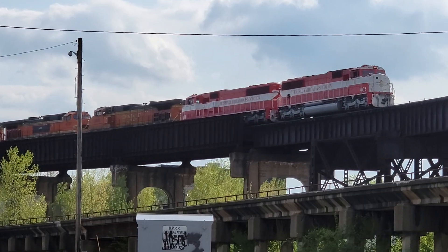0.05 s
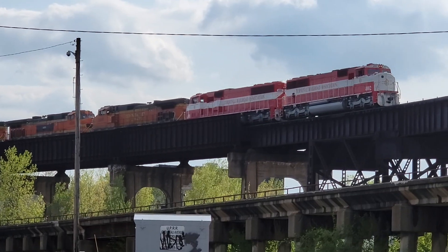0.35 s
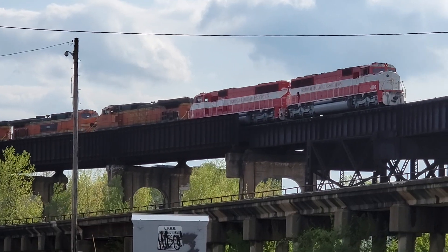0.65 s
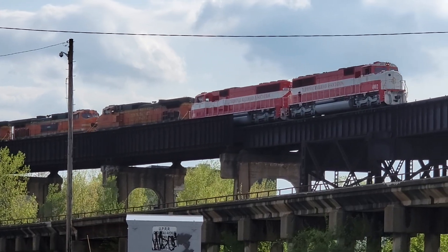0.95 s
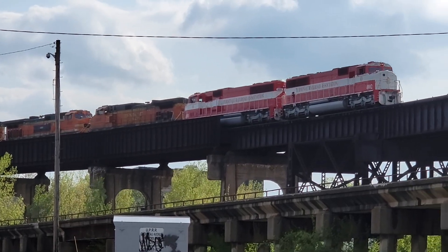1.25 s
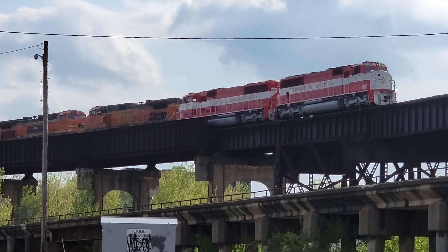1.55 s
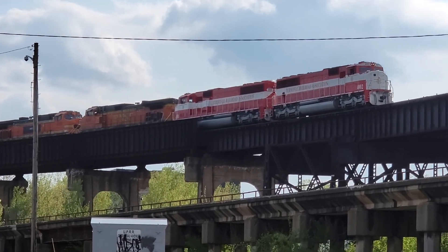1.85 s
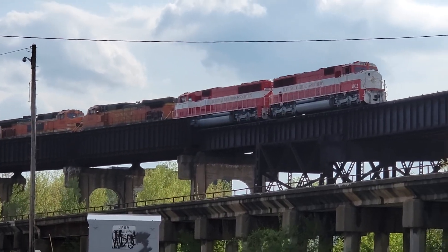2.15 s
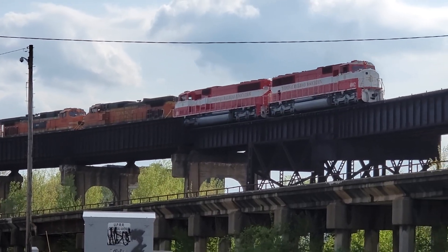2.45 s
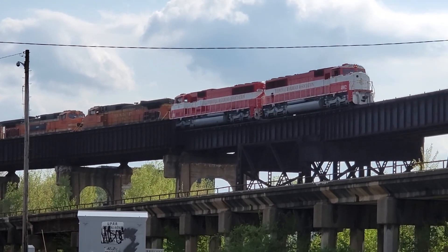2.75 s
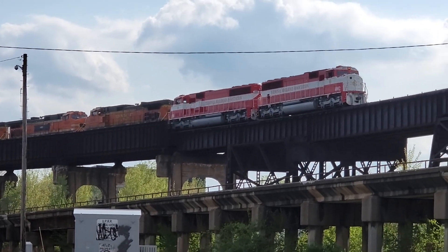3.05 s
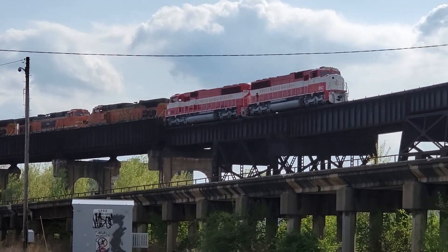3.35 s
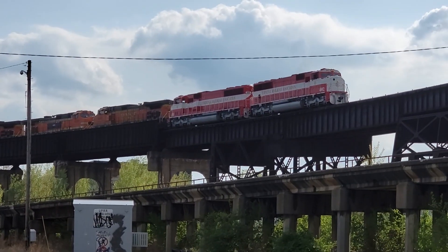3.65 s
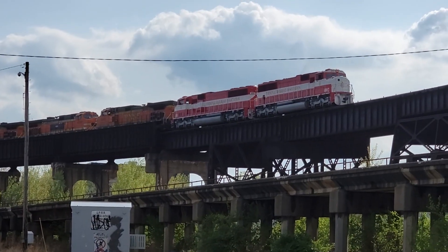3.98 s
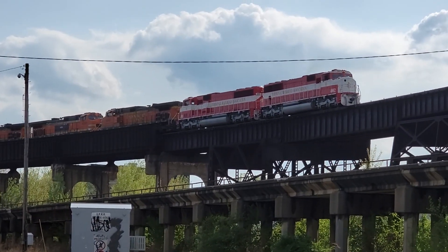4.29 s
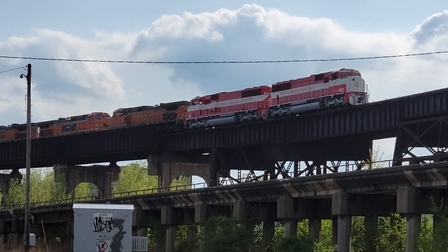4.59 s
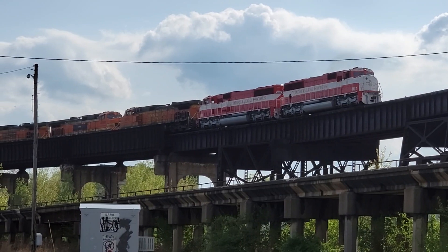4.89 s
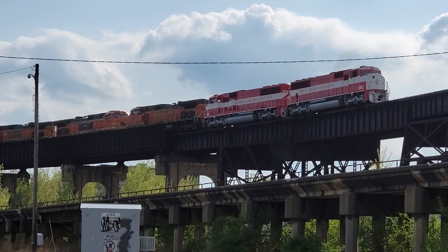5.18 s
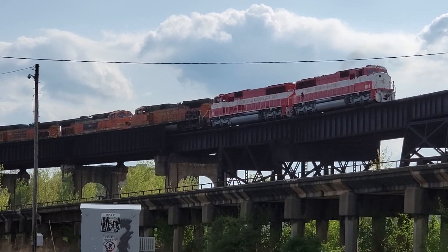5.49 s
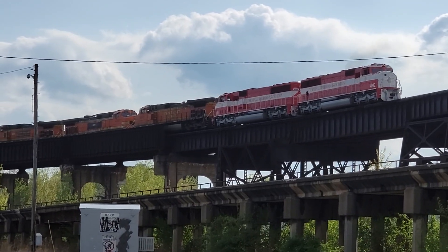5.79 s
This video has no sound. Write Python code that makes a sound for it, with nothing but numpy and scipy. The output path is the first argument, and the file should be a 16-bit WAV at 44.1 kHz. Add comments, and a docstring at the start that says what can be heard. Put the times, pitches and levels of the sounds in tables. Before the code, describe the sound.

A deep, continuous diesel drone swells and dips as locomotives climb an elevated railway, heard outdoors from ground level at some distance. A brief metallic wheel scrape opens the sound, and quieter rubbing and thin ringing return in spells. Soft, low booms punctuate the engine throb at uneven intervals. A wavering turbocharger and fan whine sits over rushing air throughout, and the drone grows strongest near the end.

```python
"""On the ground some way from a steel viaduct, as heavy diesel locomotives haul a train slowly up it.
Periodic cylinder firings make the exhausts drone and rumble; turbochargers and fans whine at their
blade-passing frequencies over a rush of cooling air. Friction makes the wheels rub and ring in spells.
There are a few faint ticks, and now and then the deep throb gives way to a soft boom."""
import sys
import numpy as np
from scipy import signal
from scipy.fft import rfft, irfft
from scipy.io import wavfile
from scipy.ndimage import uniform_filter1d, minimum_filter1d

SR = 44100
rng = np.random.default_rng(int(sys.argv[2]) if len(sys.argv) > 2 else 0)


def dump(signal):
    """Clip the signal to [-1, 1] and save it as 16-bit WAV at the path in sys.argv[1]."""
    limited = np.clip(np.atleast_2d(signal).T, -1, 1)
    pcm = np.round(limited * 32767).astype(np.int16)
    wavfile.write(sys.argv[1], SR, pcm)


N = 265830
TIME = np.arange(N) / SR
FREQS = np.maximum(np.arange(N // 2 + 1) * SR / N, 1)

# spectrum of steel rubbing on steel: f/Hz, relative level/dB
FRICTION_SPECTRUM = [(500, -24), (1500, 2.5), (2100, 3.5), (2750, -2), (3300, 0.5), (4400, -1.5),
                     (5050, -5), (5400, -10), (6500, -14.5), (7200, -23), (7800, -20.5), (8300, -17.5),
                     (9000, -29), (10300, -34), (11000, -46)]
# low booms in the rumble: t/s, peak level/dB
BOOM_EVENTS = [(.62, -7.5), (1.51, -9), (2.47, -18), (2.92, -11.5), (3.61, -17), (4.31, -14.5), (5.24, -12),
               (5.93, -10.5)]


def undb(db):
    """Amplitude ratio of a level in decibels."""
    return 10 ** (np.asarray(db) / 20)


def unit(x):
    """Normalisation to rms 1."""
    return x / np.sqrt(np.mean(x ** 2))


def contour(points):
    """Linear interpolation of (t/s, level/dB) points to a level at every sample."""
    return np.interp(TIME, *np.transpose(points))


def response(points):
    """Amplitude response through (f/Hz, level/dB) points on a logarithmic frequency axis."""
    hz, db = np.transpose(points)
    return undb(np.interp(np.log(FREQS), np.log(hz), db))


def wander(rate_hz):
    """Low-pass random fluctuation of rms 1, changing about rate_hz times a second."""
    knots = rng.standard_normal(2048)
    slow = np.interp(2 * rate_hz * TIME, np.arange(len(knots)), knots, period=len(knots))
    return unit(uniform_filter1d(slow, max(int(SR / rate_hz / 2), 1)))


def noise(spectrum, width):
    """Shaped stereo noise whose interaural coherence falls towards the treble."""
    mid, side = rfft(rng.standard_normal((2, N))) * response(spectrum)
    side *= np.minimum(width * (FREQS / 2000) ** 0.46, 1)
    return unit(irfft(np.array([mid + side, mid - side]), N))


def tone(hz, scatter, scatter_hz, width):
    """Multipath scattering by air and steelwork broadens a tone and spreads it sideways."""
    phase = 2 * np.pi * np.cumsum(hz * np.ones(N)) / SR
    cos, sin = np.cos(phase), np.sin(phase)
    mid = cos + scatter * (wander(scatter_hz) * cos + wander(scatter_hz) * sin)
    side = width * (wander(2.7) * cos + wander(3.5) * sin)
    return unit(np.array([mid + side, mid - side]))


def exhaust(cycle_hz=9.45, cylinders=16, drone_hz=74.9):
    """Impulse excitation: unequal firings ring the stack and sound harmonics of the engine cycle."""
    # exhaust spectrum: f/Hz, relative level/dB
    stack_spectrum = [(20, -25.5), (30, -14), (38, -4.5), (50, 5.5), (65, 3.5), (85, 2), (110, -7.5),
                      (150, -3), (200, -7), (230, -14.5), (310, -17.5), (460, -33.5), (900, -34),
                      (2500, -80.5)]
    # lines from unequal cylinders: multiple of the engine cycle, level/dB
    engine_orders = [(7, -35.5), (9, -32), (11, -35), (13, -44), (14, -37.5), (15, -45), (16, -34.5),
                     (20, -42.5), (22, -42)]
    # drone, swelling as the locomotives drift in and out of step: t/s, level/dB
    drone_levels = [(0.0, -17.5), (0.18, -12), (1.64, -18), (1.78, -36), (1.85, -14.5), (2.84, -14.5),
                    (3.0, -29.5), (3.74, -10.5), (4.03, -27), (4.3, -9), (4.85, -16.5), (5.1, -4),
                    (5.42, -13.5), (5.59, -26.5), (5.69, -18), (5.84, -34), (5.98, -12), (6.03, -24)]
    firing_count = cylinders * cycle_hz * TIME
    firings = np.flatnonzero(np.diff(np.floor(firing_count)))
    pulses = np.zeros(N)
    pulses[firings] = 0.013 + 0.56 * rng.standard_normal(len(firings))
    beats = unit(irfft(rfft(pulses) * response(stack_spectrum), N))
    # gas leaves in puffs, and the viaduct smears them into a rumble
    rumble = noise(stack_spectrum, 0.49) * (1 + 0.43 * np.cos(np.pi * firing_count))
    orders = sum(tone(k * cycle_hz, 0.48, 1.524, .08) * undb(db) for k, db in engine_orders)
    lope = 1 + 0.097 * np.cos(2 * np.pi * cycle_hz * TIME)
    drone = tone(drone_hz, .03, 10, .06) * lope * undb(contour(drone_levels))
    return undb(-26.5) * beats + undb(-23) * rumble + orders + drone


def throb(hz=41.9, level_db=-21, dip_db=11.5, dip_s=.11):
    """Amplitude modulation: the deep tone of the trailing locomotives sinks under each boom."""
    dips = sum(np.exp(-((TIME - s) / dip_s) ** 2) for s, _ in BOOM_EVENTS)
    return tone(hz, 0.11, 2.8, .08) * undb(level_db - dip_db * dips)


def turbocharger(start_hz=743.5, end_hz=733.5, settle_s=3.5):
    """Blade-passing tone and its octave; the pitch sinks and settles as the train draws level."""
    # blade tone heard through moving air: t/s, relative level/dB
    blade_levels = [(0.0, -39), (0.13, -37.5), (0.82, -30), (1.8, -28), (2.43, -40), (2.62, -32.5),
                    (3.41, -30), (3.56, -32.5), (3.88, -28.5), (4.67, -35), (5.64, -26), (6.01, -25),
                    (6.03, -31)]
    # its octave, swelling and fading independently: t/s, relative level/dB
    octave_levels = [(0.0, -36.5), (0.62, -48), (0.64, -60), (1.04, -39.5), (1.26, -59), (2.08, -34),
                     (2.38, -45.5), (2.9, -31), (3.11, -38.5), (3.41, -29.5), (4.16, -43.5), (5.12, -49),
                     (5.69, -35.5), (6.03, -39)]
    hz = end_hz + (start_hz - end_hz) * np.exp(-TIME / settle_s)
    blade = tone(hz, 0.21, 23, 0.094) * undb(contour(blade_levels) + 2.48)
    octave = tone(2 * hz, 0.18, 25, 0.25) * undb(contour(octave_levels) + 1.3)
    return blade + octave


def cooling_fan(blade_hz=1044.3):
    """Periodic loading of the air radiates a tone at the blade-passing frequency."""
    # fan tone: t/s, relative level/dB
    fan_levels = [(0.0, -46), (0.81, -32), (1.21, -38), (2.38, -34.5), (2.4, -39), (3.34, -35),
                  (3.44, -44.5), (4.15, -35), (4.35, -51), (4.53, -37.5), (5.14, -35), (5.17, -41),
                  (5.77, -44.5), (5.84, -37), (5.91, -49), (5.99, -31.5), (6.03, -39)]
    return tone(blade_hz, 0.27, 31, 0.11) * undb(contour(fan_levels) + 2.7)


def blowers_and_gears():
    """Steady rotation in the other locomotives gives faint spectral lines that fade in and out."""
    # whines: f/Hz, mean level/dB
    lines = [(415, -56), (522, -57), (690, -48.5), (717, -44.5), (748, -46.5), (1056, -46.5), (1070, -46.5),
             (1285, -56), (1496, -48), (1546, -49), (2088, -49.5), (5372, -67.5)]
    return sum(tone(hz, .6, 9, .28) * undb(db + 1.8 * wander(1.2)) for hz, db in lines)


def cooling_air():
    """Turbulent flow radiates broadband noise of fluctuating level."""
    # spectrum of the rush: f/Hz, relative level/dB
    rush_spectrum = [(150, -7.5), (400, -10), (580, -5.5), (800, 4), (910, 0.5), (1080, 3.5), (1400, -0.5),
                     (1670, -6), (2000, -3), (2400, -14.5), (2750, -14), (3600, -17.5), (5000, -26.5),
                     (7000, -50.5), (12000, -69)]
    # strength of the rush: t/s, relative level/dB
    rush_levels = [(0.0, -35.5), (0.18, -40), (0.35, -40), (1.31, -37.5), (2.45, -40), (5.12, -41),
                   (6.03, -38)]
    return noise(rush_spectrum, 0.57) * undb(contour(rush_levels) + 6.5 + 0.97 * wander(14))


def scrape_envelopes(attack_s=0.07, release_s=0.18, rolling_db=-49):
    """Incoherent addition: spells of rubbing and ringing sum in power, the rubbing over a steady floor."""
    # spells of scraping: start t/s, duration/s, rubbing level/dB, ringing level/dB
    spells = [(-.1, 0.25, -34.5, -31.5), (0.404, 1.0, -45.5, -61), (1.414, 0.71, -41, -58),
              (3.626, 0.17, -45, -53), (3.8, 0.34, -40.5, -41), (4.337, 0.52, -45, -55),
              (5.0, 0.95, -48.5, -67.5), (5.783, 0.16, -44.5, -41)]
    rub_power, ring_power = undb(rolling_db) ** 2, 0
    for s, length, rub_db, ring_db in spells:
        attack = np.clip((TIME - s) / attack_s, 0, 1)
        release = np.exp(-np.maximum(TIME - s - length, 0) / release_s)
        rub_power += (attack * release * undb(rub_db)) ** 2
        ring_power += (attack * release * undb(ring_db)) ** 2
    return np.sqrt(rub_power), np.sqrt(ring_power)


def slips(count=2500, decay_s=0.016):
    """Stick-slip: each tiny slip of steel on steel excites one damped mode."""
    t = TIME[:SR // 10]
    envelope = np.exp(-t / decay_s) * (1 - np.exp(-4 * t / decay_s))
    out = np.zeros((2, N + len(t)))
    for when, pitch, size, lag in rng.random((count, 4)):
        hz = 2000 + 7000 * pitch
        ear_phase = np.array([[0], [np.pi * (lag - .5)]])
        start = int(when * N)
        out[:, start:start + len(t)] += size * envelope * np.sin(2 * np.pi * hz * t + ear_phase)
    return unit(irfft(rfft(out[:, :N]) * response(FRICTION_SPECTRUM), N))


def wheel_scraping():
    """Friction excitation: flanges grind on the rail, and each wheel mode flares and fades on its own."""
    # wheel modes: f/Hz, linewidth/Hz, relative level/dB
    wheel_modes = [(1250, 250, -8), (1580, 350, -2), (1950, 220, -7), (2415, 60, -10), (2622, 60, -9),
                   (3160, 70, -15), (3290, 40, -17), (3640, 70, -15), (4012, 55, -9), (4810, 60, -16),
                   (5890, 120, -24), (9410, 180, -39)]
    rub, ring = scrape_envelopes()
    grind = noise(FRICTION_SPECTRUM, .48) + .5 * slips()
    out = grind * rub * undb(.5 * wander(30))
    for hz, linewidth, db in wheel_modes:
        out += tone(hz, 2, linewidth, .3) * ring * undb(db + 1.5 * wander(10))
    return out


def wheel_singing():
    """Resonance: single wheel modes swell and fade as narrow bands of sound."""
    # singing modes: centre t/s, duration/s, f/Hz, linewidth/Hz, level/dB
    notes = [(.08, .3, 2622, 70, -44), (.6, .7, 4950, 40, -58), (1.5, .7, 2222, 25, -48),
             (1.6, .5, 3295, 30, -55), (1.8, .7, 5860, 110, -58), (2.05, .22, 5112, 35, -49),
             (4.0, .25, 3645, 40, -52), (4.08, .25, 5890, 90, -56), (4.15, .2, 4012, 25, -48),
             (4.6, .45, 4012, 25, -52), (5.7, 1.1, 8130, 320, -67), (5.88, .2, 3230, 70, -50),
             (5.88, .2, 4830, 70, -56)]
    return sum(tone(hz, 2, linewidth, .3) * undb(db) * np.exp(-(2 * (TIME - s) / length) ** 2)
               for s, length, hz, linewidth, db in notes)


def ticks():
    """Broadband transients: bright noise starts abruptly and decays exponentially."""
    # small ticks: t/s, decay time/s, initial level/dB
    onsets = [(.161, .012, -54), (2.149, .002, -43), (5.19, .007, -57)]
    envelope = sum(undb(db) * (TIME >= s) * np.exp(-np.abs(TIME - s) / decay) for s, decay, db in onsets)
    return envelope * noise([(1000, -9), (4000, -3), (9000, -0.5), (15000, -21.5)], width=.2)


def booms(hz=63, swell_s=0.041):
    """Gaussian tone bursts: each low boom swells and dies within a few cycles."""
    out = np.zeros(N)
    for s, db in BOOM_EVENTS:
        envelope = undb(db) * np.exp(-((TIME - s) / swell_s) ** 2)
        out += envelope * np.sin(2 * np.pi * (hz * TIME + rng.random()))
    return out


def scene(pan_db=1.36):
    """Superposition: engines lie ahead; a level difference sets air and wheels a little to the right."""
    ahead = exhaust() + throb() + turbocharger() + cooling_fan() + blowers_and_gears() + booms() + ticks()
    aside = cooling_air() + wheel_scraping() + wheel_singing()
    return ahead + aside * undb(np.array([[-pan_db], [pan_db]]) / 2)


def record(dry, cutoff_hz=15700, fade_s=.002):
    """Smooth peak limiting holds the crests at full scale; the ends fade and a low-pass cuts the top."""
    hold = SR // 50
    needed_gain = 1 / np.maximum(np.abs(dry).max(axis=0), 1)
    gain = uniform_filter1d(minimum_filter1d(needed_gain, hold), hold)
    fade = np.minimum(np.minimum(TIME, TIME[::-1]) / fade_s, 1)
    lowpass = signal.ellip(8, .2, 70, cutoff_hz, fs=SR, output="sos")
    return signal.sosfilt(lowpass, dry * gain * fade)


dry = scene()
out = record(dry)
dump(out)
```